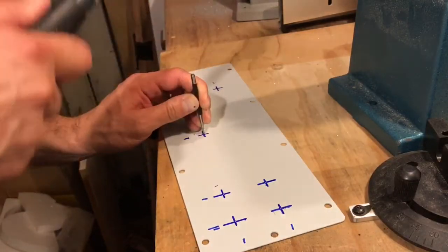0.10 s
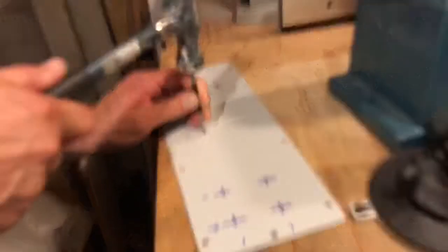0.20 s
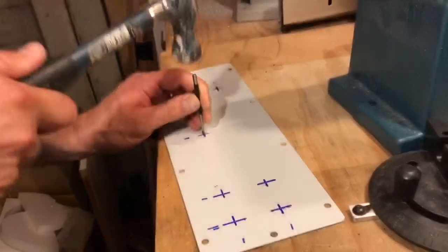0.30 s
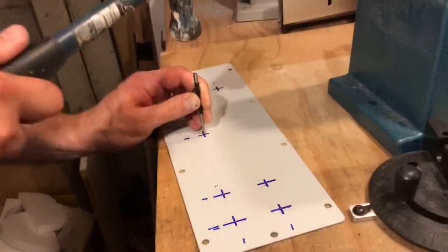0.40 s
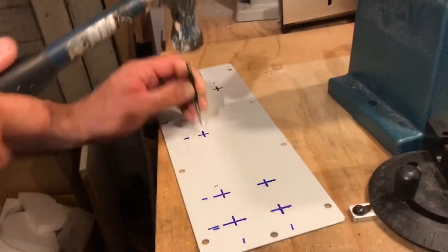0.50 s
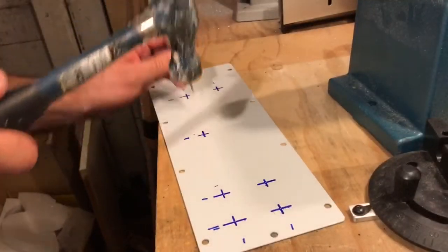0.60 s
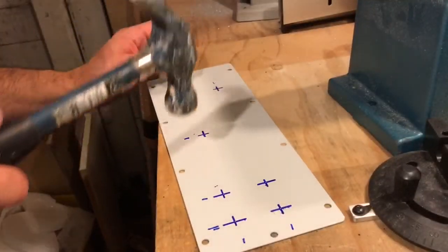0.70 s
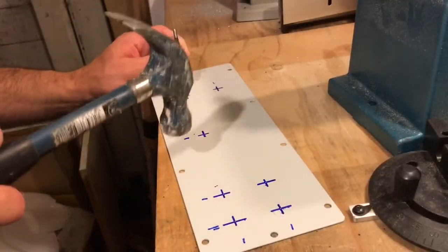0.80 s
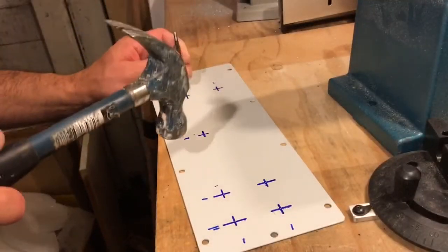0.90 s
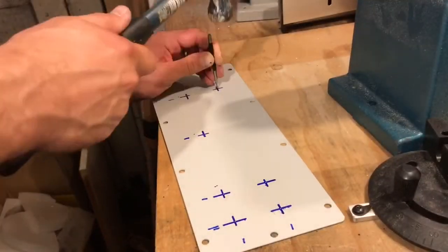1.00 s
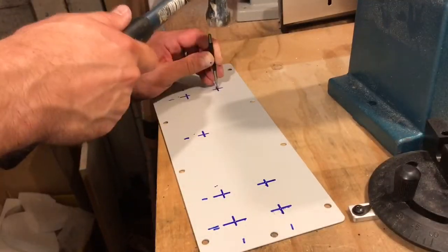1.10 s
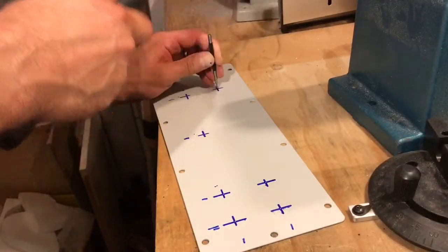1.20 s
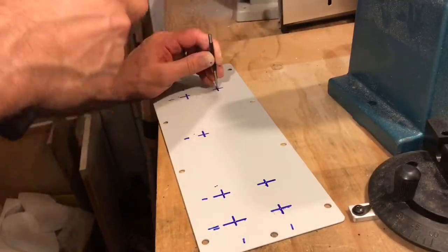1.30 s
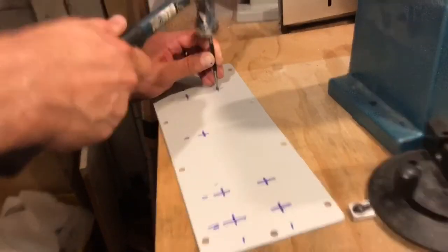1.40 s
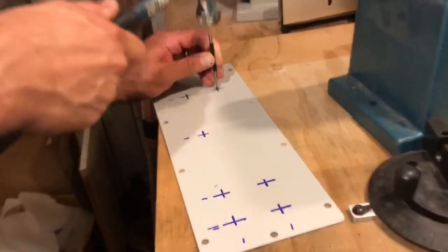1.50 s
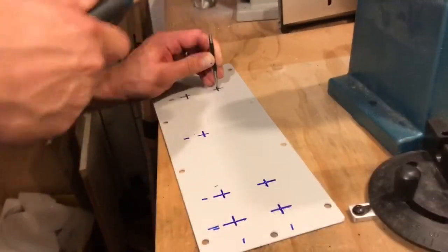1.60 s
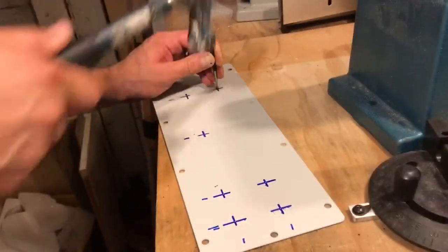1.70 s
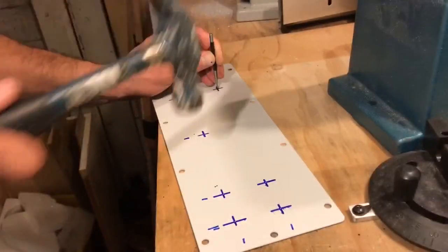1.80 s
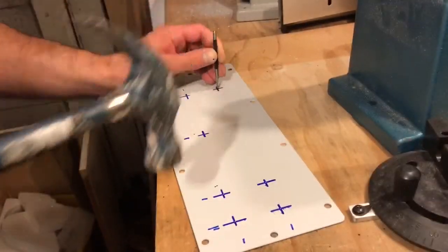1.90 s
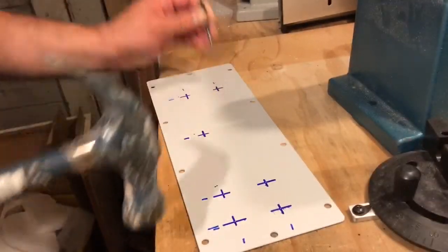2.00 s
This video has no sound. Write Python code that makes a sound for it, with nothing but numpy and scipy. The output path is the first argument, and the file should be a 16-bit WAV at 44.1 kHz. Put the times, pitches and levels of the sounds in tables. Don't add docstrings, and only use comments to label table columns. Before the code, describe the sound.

Hammer blows on a steel punch, heard close in a small workshop. At 0.24 s a loud, bright crack with hollow bench knock and short plate rattle, dying quickly. Very faint hum, hiss, tiny ticks and scuffs remain. Sound drops out around 1.0 s for an instant. At 1.49 s a second blow, with deeper thump and sharp rebound at 1.53 s, then a slight scrape near 1.75 s.

```python
import sys
import numpy as np
from scipy import signal
from scipy.io import wavfile

SR = 44100
rng = np.random.default_rng(int(sys.argv[2]) if len(sys.argv) > 2 else 0)


def generate_wav(signal):
    frames = np.transpose(np.atleast_2d(signal))
    scaled = np.clip(frames, -1, 1) * 32767
    pcm = np.round(scaled).astype(np.int16)
    wavfile.write(sys.argv[1], SR, pcm)


def how_loud(loudness_db):
    steps = np.asarray(loudness_db, float) / 20
    return 10 ** steps


N = 90405

# start_s, crack_db, bench_db, wash_db
FIRST_BLOW = [
    (0.2376, 3, -9.5, -12.5),
    (0.2466, -30, -7.5, -15),
    (.2950, -36, -24.5, -65),
    (0.31, -52.5, -19, -43),
]
SECOND_BLOW = [
    (1.4870, 2, -10, -8),
    (1.4960, -19, -9, -23.5),
    (1.5302, -3.5, -20.5, -35.5),
    (1.6210, -56, -51, -87),
]
# pitch_hz, level_db, t60_s
BENCH_FIRST = [(115, -22.5, 1.1), (213.5, 1.5, 0.26), (237.7, -7.5, 0.31), (281.3, -1, 0.23),
               (359, -14.5, 0.12), (454, -11.5, 0.068), (425.3, -34, 1.6), (594, -8, .13),
               (710, -13.5, 0.18), (850, -12.5, 0.27), (950, -14, .11), (1260, -9.5, 0.071),
               (1564, -7, 0.067), (2000, -13, .12)]
BENCH_SECOND = [(118.6, -29.5, 1), (140, -25, 0.31), (190, -10, 0.12), (210.9, 4.5, 0.1), (274, -10, 0.16),
                (292.6, -36.5, 0.087), (409, -23.5, 0.21), (483, 0.5, 0.13), (586, -13, 0.095),
                (791, -14.5, 0.14), (1014.3, -14.5, 0.1), (1265, -8, 0.06), (1517, -40, .12),
                (1790, -11.5, .12)]
# pitch_hz, level_db, t60_s
STEEL_MODES = [(3240, -16, .015), (3500, -14, .012), (4500, -16, .01), (8700, -8, .008), (9410, -22, .06),
               (10690, -18, .04), (12000, -8, .008), (12770, -11, .035)]
# pitch_hz, density_db (per Hz)
WASH_COLOUR = [(90, -33), (200, -5.5), (400, -4.5), (1200, -12), (2500, -19.5), (5000, -28.5),
               (12500, -26.5), (16000, -43)]
# pitch_hz, t60_s
WASH_T60 = [(100, 0.3), (300, 0.2), (1000, 0.16), (3000, 0.16), (9000, 0.16), (15000, 0.16)]
# pitch_hz, level_db
LINGER = [(60, -37), (115, -18.5), (200, -18.5), (300, -26.5), (500, -36), (1200, -37.5), (3000, -48)]
# lead_s, highs_db, lows_db
EARLY_COPIES = [
    (1024 / SR, -22.5, -49),
    (900 / SR, -39.5, -52.5),
    (512 / SR, -32.5, -40),
]
# start_s, length_s, level_db, pitch_hz
SWELLS = [
    (.226, 0.011, -14.5, 290),
    (1.477, 0.018, -22.5, 190),
    (1.47, 0.015, -38.5, 3100),
]
# start_s, pitch_hz, level_db, t60_s
THUMPS = [
    (0.242, 45.8, -20.5, 0.11),
    (1.4896, 53.65, -8, .07),
]
# start_s, length_s, gain_db
SETTLE = [
    (0.288, .025, -8.5),
    (1.54, 0.047, -7.5),
]
# start_s, length_s, level_db, pitch_hz
SCUFFS = [
    (0.169, 0.0071, -70, 2480),
    (.52, 0.067, -77, 3000),
    (0.713, 0.0029, -68, 5000),
    (1.19, 0.0095, -72.5, 3100),
    (1.426, 0.0063, -65, 3130),
    (1.741, 0.084, -61.5, 2130),
]
TICK_STARTS = [.04, 1.11]
# pitch_hz, density_db (per Hz)
HUM_COLOUR = [(25, -10), (45, -0.5), (72, -19.5), (140, -12.5), (200, -2.5), (275, -10), (430, -17.5),
              (2500, -34.5)]
# pitch_hz, level_db (rms)
HUM_LINES = [(274.5, -67.5), (1373, -86), (1685, -85), (2213, -85), (2600, -86.5)]
# pitch_hz, density_db (per Hz)
HISS_COLOUR = [(2000, -6.5), (4000, -2.5), (7000, -4), (9500, -6), (10500, -9), (12000, -1), (16000, -9)]
# time_s, level_db
HISS_LEVEL = [(0, -75.5), (.2, -77), (.42, -78.5), (.5, -68), (.75, -70), (.95, -73.5), (1.1, -75.5),
              (1.45, -75.5), (1.68, -73), (1.8, -72.5), (2.05, -64)]
# pitch_hz, width_hz, level_db (rms)
DRONES = [(97, 41, -57.5), (280.6, 12, -64)]
# time_s, level_db
RUMBLE_LEVEL = [(0, -64), (.7, -63), (.98, -52), (1.1, -75), (1.5, -75), (2.05, -77.5)]

GAP_START_S, GAP_END_S = 1, 1.031


def rms_one(x):
    return x / np.sqrt(np.mean(x ** 2) + 1e-20)


def at_hz(points, hz):
    table_hz, value = np.transpose(points)
    return np.interp(np.log(hz), np.log(table_hz), value)


def butter(x, hz, kind, order=2):
    return signal.sosfilt(signal.butter(order, hz, kind, fs=SR, output="sos"), x)


def drift(rate):
    r = np.exp(-80 * np.pi * rate / SR)
    white = rng.standard_normal(N // 40 + 2002)
    slow = signal.lfilter([1], [1, -2 * r, r * r], white)[2000:]
    return np.interp(np.arange(N) / 40, np.arange(len(slow)), rms_one(slow))


def clicks(s, db):
    out = np.full(N, 1e-18)
    out[(np.asarray(s) * SR).astype(int)] = how_loud(np.asarray(db, float))
    return out


def ring(x, modes):
    out = 0
    for k, (hz, db, t60) in enumerate(modes):
        r = how_loud(-60 / (max(t60, .005) * SR))
        w = 2 * np.pi * hz / SR
        mode = signal.lfilter([0, np.sin(w)], [1, -2 * r * np.cos(w), r * r], x)
        out = out + (-1) ** k * how_loud(db) * mode
    return out


def fade(x, t60):
    return signal.lfilter([1], [1, -how_loud(-60 / (t60 * SR))], x)


def bands(spectrum):
    edges = 25 * 2 ** np.arange(0, 9.5, 1 / 3)
    white = rng.standard_normal((2, N))
    out = []
    for k, (low, high) in enumerate(zip(edges, edges[1:])):
        centre = np.sqrt(low * high)
        out.append((centre, how_loud(at_hz(spectrum, centre)) * butter(white[k % 2], [low, high], "band")))
    return out


def workshop():
    t = np.arange(N) / SR
    hum_db, steady_db = -58, -77.5
    hum = how_loud(hum_db) * rms_one(sum(band * how_loud(drift(17)) for hz, band in bands(HUM_COLOUR) if hz < 3500))
    tones = 0
    for k, (hz, db) in enumerate(HUM_LINES):
        tones = tones + how_loud(db + 2.5 + 2.0 * drift(3)) * np.sin(2 * np.pi * hz * t + k)
    hiss = rms_one(sum(band for hz, band in bands(HISS_COLOUR) if hz > 2000))
    hiss = hiss * how_loud(np.interp(t, *np.transpose(HISS_LEVEL)))
    steady = how_loud(steady_db) * rms_one(butter(rng.standard_normal(N), [1500, 3000], "band", order=1))
    return hum + tones + steady + hiss


def drones():
    white = rng.standard_normal(N)
    rumble_db = np.interp(np.arange(N) / SR, *np.transpose(RUMBLE_LEVEL))
    out = rms_one(butter(white, [30, 58], "band")) * how_loud(rumble_db)
    for hz, width, db in DRONES:
        out = out + how_loud(db) * rms_one(butter(white, [hz - width / 2, hz + width / 2], "band"))
    return out


def ticks():
    gap_s, level_db = .1022, -63
    before = np.arange(TICK_STARTS[0], GAP_START_S, gap_s)
    after = np.arange(TICK_STARTS[1], N / SR, gap_s)
    s = np.concatenate([before, after])
    envelope = fade(clicks(s, level_db + 0 * s), .01)
    return butter(rng.standard_normal(N) * envelope, 11500, "high", order=4)


def scuffs():
    t, out = np.arange(N) / SR, 0
    grit = rng.standard_normal(N) * how_loud(1.726 * drift(150))
    for s, length, db, hz in SCUFFS:
        puff = np.sin(np.pi * np.clip((t - s) / length, 0, 1))
        out = out + how_loud(db) * puff * rms_one(butter(grit, [hz * 0.82, hz * 1.26], "band", order=1))
    return out


def swells():
    t, out = np.arange(N) / SR, 0
    for s, length, db, hz in SWELLS:
        ramp = (t - s) / length * ((t > s) & (t < s + length))
        out = out + how_loud(db) * ramp * np.sin(2 * np.pi * hz * (t - s))
    return out


def thumps():
    return sum(butter(ring(clicks([s], [0]), [(hz, db, t60)]), 150, "low") for s, hz, db, t60 in THUMPS)


def settle():
    gate_after_s, gate_db_per_s = 0.15, -120
    t = np.arange(N) / SR
    first = t < GAP_END_S
    bench_db = np.where(first, *[db * np.clip((t - s) / length, 0, 1) for s, length, db in SETTLE])
    since = t - np.where(first, FIRST_BLOW[0][0], SECOND_BLOW[0][0])
    return how_loud(bench_db), how_loud(gate_db_per_s * np.maximum(since - gate_after_s, 0))


def crack_burst(s, crack_db):
    crack_s = 0.0011
    return rng.standard_normal(N) * fade(clicks(s, crack_db), 6.9 * crack_s)


def crack_sound(burst):
    bright = butter(burst, [7500, 14000], "band")
    full = butter(burst, [1560, 14000], "band")
    return .5 * (bright + how_loud(-0.5) * full)


def bench_ring():
    out = 0
    for blow, modes in ((FIRST_BLOW, BENCH_FIRST), (SECOND_BLOW, BENCH_SECOND)):
        s, _, bench_db, _ = np.transpose(blow)
        push = butter(clicks(s, bench_db), 1500, "low", order=1)
        out = out + ring(push, modes)
    return out


def room_wash(s, wash_db, gated):
    rise_s, linger_t60_s = 0.0013, 0.97
    parts, start = bands(WASH_COLOUR), clicks(s, wash_db)
    rise, late = fade(start, 2.3 * rise_s), fade(start, linger_t60_s)
    wash = 0
    for hz, band in parts:
        early = (fade(start, at_hz(WASH_T60, hz)) - rise) * gated
        wash = wash + band * (early + how_loud(at_hz(LINGER, hz)) * late)
    return wash / np.std(sum(band for _, band in parts))


def blows():
    s, crack_db, _, wash_db = np.transpose(FIRST_BLOW + SECOND_BLOW)
    burst = crack_burst(s, crack_db)
    crack = crack_sound(burst)
    steel = how_loud(-17) * ring(burst, STEEL_MODES)
    damped, gated = settle()
    bench = bench_ring() * damped
    wash = room_wash(s, wash_db, gated)
    highs = crack + 0.37 * steel + .6 * wash
    lows = butter(bench, [150, 230], "band")
    ahead = 0
    for lead, high_db, low_db in EARLY_COPIES:
        ahead = ahead + np.roll(how_loud(high_db) * highs + how_loud(low_db) * lows, -int(round(lead * SR)))
    return crack + steel + bench + wash + ahead


def scene():
    impacts = blows() + swells() + thumps()
    return (impacts + scuffs() + ticks() + workshop() + drones())[None]


def low_pass(x):
    return signal.sosfilt(signal.butter(12, 16940, fs=SR, output="sos"), x)


def record(dry):
    peak, gap_db, fade_out_s, fade_in_s = .86, -44, 0.0053, 0.034
    t = np.arange(N) / SR
    closing = np.clip((GAP_START_S - t) / fade_out_s, 0, 1)
    opening = np.clip((t - GAP_END_S) / fade_in_s, 0, 1)
    gate = np.maximum(np.where(t < GAP_END_S, closing, opening), how_loud(gap_db))
    rounded = dry / (1 + (dry / peak) ** 4) ** .25
    treble_limit = signal.cheby2(14, 90, 16900, fs=SR, output="sos")
    mix = signal.sosfilt(treble_limit, rounded * gate)
    return low_pass(mix)


dry = scene()
out = record(dry)
generate_wav(out)
```